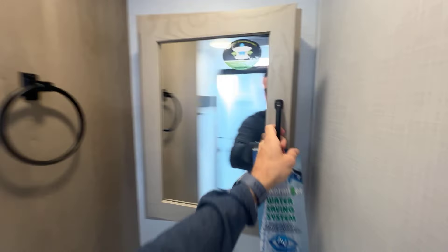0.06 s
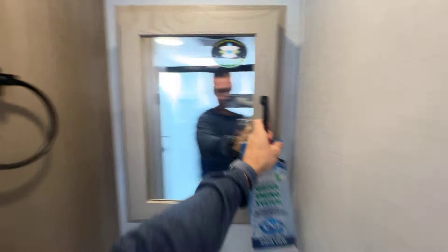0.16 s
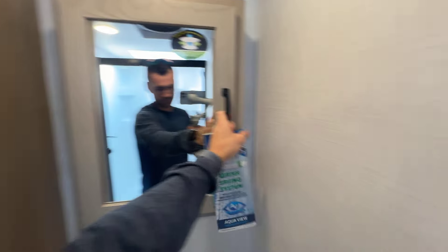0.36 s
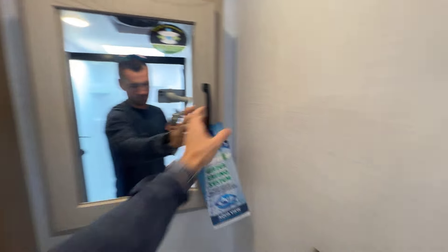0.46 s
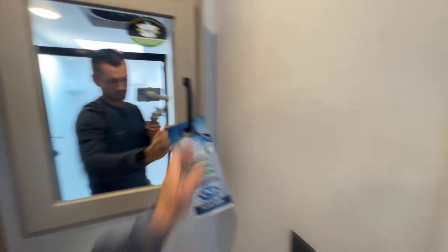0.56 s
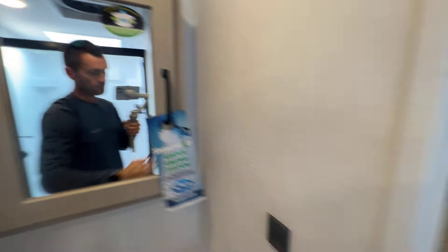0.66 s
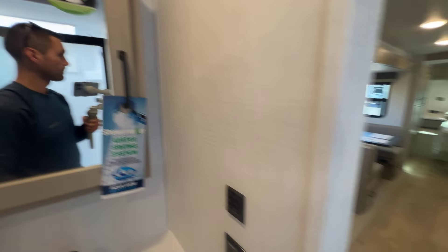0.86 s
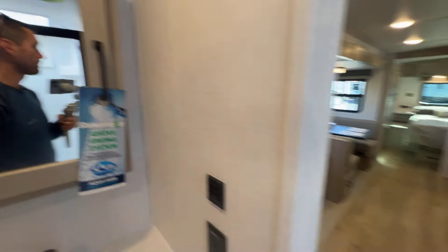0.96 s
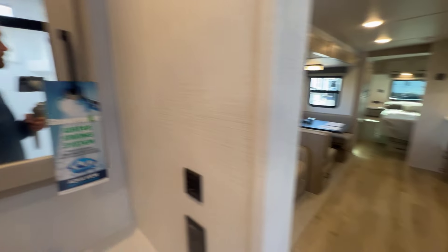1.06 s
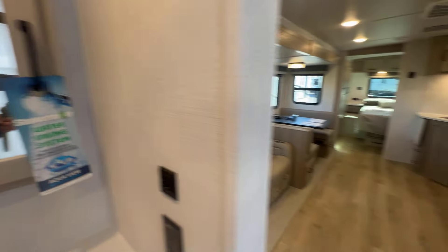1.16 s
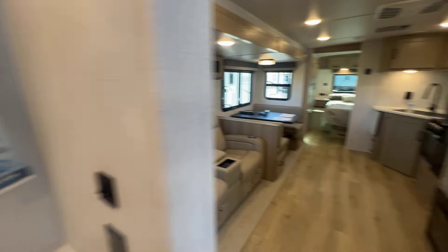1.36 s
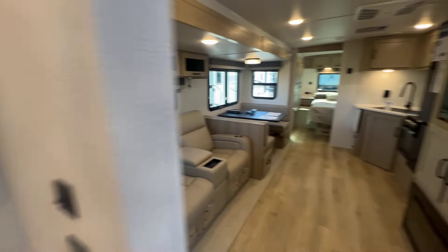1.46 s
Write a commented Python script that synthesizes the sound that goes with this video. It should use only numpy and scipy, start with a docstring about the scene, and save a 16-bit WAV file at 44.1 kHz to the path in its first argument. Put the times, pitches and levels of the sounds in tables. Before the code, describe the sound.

A wooden cabinet door shuts with a sharp knock in a small bathroom.

```python
"""Cabinet door shut in a trailer bathroom.

A mirrored wooden door is pushed shut an arm's length away. The catch snaps in a run of
hard contacts, the panel thumps, the thin walls boom and the small room rings.
A card hanging from the handle swings back, scuffs and taps the door.
Faint rubs, ticks and a footfall follow the knock; a fan murmurs throughout."""
import sys
import numpy as np
from scipy import signal
from scipy.fft import rfft, irfft
from scipy.io import wavfile
from scipy.ndimage import uniform_filter1d

SR = 44100
rng = np.random.default_rng(int(sys.argv[2]) if len(sys.argv) > 2 else 0)


def to_wav(s):
    """Save 16-bit WAV."""
    ch = np.atleast_2d(s).T  # columns
    pcm = np.round(np.clip(ch, -1, 1) * 32767)  # PCM
    wavfile.write(sys.argv[1], SR, pcm.astype(np.int16))


N = 66150

# fan and duct spectrum: freq_hz, gain_db
FAN_SPECTRUM = [(20, -26), (45, 1), (100, -0.5), (180, -12.5), (260, -9.5), (330, -11.5), (420, -1.5),
                (490, -7), (555, -2), (680, -15.5), (850, -22), (1200, -31.5), (1550, -26.5), (1900, -35.5),
                (2450, -33), (3900, -47), (8000, -52.5), (15000, -59.5)]
# drift of the murmur: time_s, gain_db
FAN_DRIFT = [(0, 2), (0.402, -0.5), (0.701, -1), (1.0, .5), (1.13, -2), (1.19, 1), (1.26, -2), (1.4, -2),
             (1.469, -2)]
# wall bumps as the door swings: start_s, level_db
SWING_BUMPS = [(0.02, -24), (0.072, -29.5), (0.161, -32)]
# thin walls and enclosed air: pitch_hz, level_db, t60_s, rise_s
WALL_MODES = [(51, -17.5, 0.98, 0.012), (64.45, -1.5, 0.65, 0.017), (76.05, -8, 0.5, 0.0015)]
# door panel and cabinet: pitch_hz, level_db, t60_s, rise_s
PANEL_MODES = [(95.3, -13, 0.62, .003), (122, -6, 0.15, .002), (142.2, -4.5, .1, 0.0032),
               (147.8, -26, 0.57, .006), (166, -10.5, 0.1575, .001), (187.8, -23.5, 0.47, .002),
               (215.2, -9.5, .28, .012), (231.5, -21.5, 0.53, 0.016), (285.7, -18, .25, 0.0068),
               (361.3, -16.5, .26, 0.004), (457, -29, 0.28, 0.0013), (499.5, -19.5, 0.11, 0.0022),
               (628, -32, 0.089, 0.0022)]
# rubs of hand, sleeve and card: centre_s, level_db, half_width_s
RUB_STROKES = [(0.104, -16.5, 0.023), (0.491, -11, 0.0067), (0.581, -16.5, .006), (1.298, -37, 0.0057),
               (1.425, -30, 0.0017)]
# rub spectrum: freq_hz, gain_db
RUB_SPECTRUM = [(300, 6.5), (1500, -14), (2400, 0.5), (3400, -3), (5000, -16), (9000, -16), (15000, -24)]
# catch hitting frame: start_s, crack_db, ring_db
CATCH_CONTACTS = [(.2113, 0, -9.5), (.2126, 9.5, -9.5), (.2142, 1.5, 0.5), (.2155, 6.5, -11.5),
                  (.2171, -1, 6.5), (.2200, -13.5, -22.5), (.2237, -6, -23)]
# crack spectrum: freq_hz, gain_db
CRACK_SPECTRUM = [(200, -0.5), (600, -8.5), (1050, -2), (1500, -1), (1950, 0), (2400, -0.5), (3300, 2),
                  (4000, -2), (5200, -4), (6000, -4), (7100, -2), (8800, -4.5), (11000, -4.5), (13500, -15),
                  (15500, -9)]
# frame and catch: pitch_hz, level_db, t60_s
FRAME_MODES = [(870, -9.5, .18), (1068, -21.5, 0.094), (1094.5, -16, 0.2), (1401, -14.5, 0.22),
               (1622, -3, 0.17), (2080, -15, .12), (2335, -11.5, 0.22), (2379, 6, 0.041), (2456, -9.5, .07),
               (2976, -8, 0.044), (3223, -12, .09), (3410, -11.5, .1)]
# bathroom reverberation: centre_hz, level_db, t60_s
ROOM_BANDS = [(60, 9.5, .45), (142, 8, .42), (250, 4.5, .3), (390, 12.5, .24), (560, 1.5, .24),
              (750, -5, 0.31), (1000, -5, 0.18), (1455, 1.5, 0.1), (1932, -3, 0.37), (2520, 2, 0.28),
              (2900, -6.5, .32), (3930, -9.5, 0.44), (6783, -5, .4), (9000, -11, .35), (12000, -12.5, .34),
              (15230, -19, .28)]
# dull settling knock: freq_hz, gain_db
REBOUND_SPECTRUM = [(60, -22.5), (200, 0), (370, 3), (520, -14), (1000, -14), (1500, -21.5), (3000, -34),
                    (15000, -62.5)]
# dips and swells of the door's decay: time_s, gain_db
DECAY_SWELL = [(.29, -2), (.38, -3.5), (0.472, 3.5), (.515, 3), (0.562, 2), (.69, 12.5), (.74, 5.5),
               (0.902, 14.5)]
# faint high hiss in the knock's decay: freq_hz, gain_db
TAIL_HISS_SPECTRUM = [(1000, -20), (4000, -2.5), (7000, -1), (12000, -9.5), (15500, -9)]
# ticks of the settling door: start_s, pitch_hz, level_db, t60_s
DOOR_TICKS = [(.483, 3460, -54.5, 0.058), (.582, 1556, -60, .1), (.582, 2160, -57.5, .06),
              (1.299, 2360, -63, 0.056)]
# card edge scuffing the door: start_s, level_db, t60_s
CARD_SCUFFS = [(0.803, 1.004, 0.11), (0.8102, 1, 0.055)]
# scuff spectrum: freq_hz, gain_db
SCUFF_SPECTRUM = [(300, -5), (1500, -31.5), (2000, 11), (2450, 14.5), (3200, 2.5), (5000, 7.5), (8500, 7.5),
                  (12000, 4.5), (15000, 0)]
# card landing on the door: start_s, level_db, t60_s
CARD_TAPS = [(.8300, 9.5, 0.014), (0.84, -0.5, .015), (0.8433, 3, 0.011), (0.855, -4, 0.071)]
# tap spectrum: freq_hz, gain_db
TAP_SPECTRUM = [(300, -16), (800, -1.5), (1300, 1), (1650, -6), (2450, 1.5), (3200, 1.5), (5000, -8.5),
                (8500, -7.5), (11500, -14), (15000, -15)]
# handle resonances: pitch_hz, level_db, t60_s
HANDLE_MODES = [(2456, -56.5, 0.054), (2540, -58, 0.11), (2640, -69, 0.14), (3600, -55, 0.047),
                (4540, -57, 0.04)]
# footfall spectrum: freq_hz, gain_db
STEP_SPECTRUM = [(25, -4), (50, 9.5), (130, -2), (260, -10.5), (450, -1), (800, -25), (3000, -51),
                 (15000, -81)]
# phase of left over right: freq_hz, lead_rad
STEREO_PHASE = [(0, 0), (500, 0), (700, .8), (900, -.4), (1500, -.1), (2700, 0), (3000, .7), (4000, .7),
                (5600, -.2), (7600, -.3), (9500, -2.8), (11000, -4), (13000, -6.1), (14000, -6.3),
                (15600, -8.5)]
# level of left over right: freq_hz, balance_db
STEREO_BALANCE = [(60, 2.2), (300, 2.8), (500, 0), (750, -8.5), (1400, 3), (3000, -1), (15000, -.5)]

SIDE_SIGNS = np.array([[1], [-1]])


def undb(db):
    """Decibels to gain."""
    return 10 ** (np.asarray(db) / 20)


def on_log(hz, points):
    """Interpolate a table over log frequency."""
    freq_hz, values = np.array(points, float).T
    return np.interp(np.log(np.maximum(hz, 1)), np.log(freq_hz), values)


def since(start_s):
    """Seconds since an event, zero before it."""
    return np.maximum(np.arange(N) / SR - start_s, 0)


def fade(t, t60_s):
    """Exponential decay."""
    return np.exp(-np.log(1000) * t / t60_s)


def colour(x, spectrum):
    """Minimum-phase filter that keeps the power of white noise."""
    gain = undb(on_log(np.arange(N + 1) * SR / (2 * N), spectrum))
    cepstrum = irfft(np.log(gain / np.sqrt(np.mean(gain ** 2))))
    cepstrum[1:N] *= 2
    cepstrum[N + 1:] = 0
    return irfft(rfft(x, 2 * N) * np.exp(rfft(cepstrum)))[:N]


def burst(start_s, t60_s):
    """Decaying noise of two surfaces meeting."""
    t = since(start_s)
    return (t > 0) * fade(t, t60_s) * rng.standard_normal(N)


def stroke(centre_s, level_db, half_width_s):
    """Noise under a Gaussian envelope."""
    envelope = np.exp(-((since(0) - centre_s) / half_width_s) ** 2)
    return undb(level_db) * envelope * rng.standard_normal(N)


def ring(start_s, pitch_hz, t60_s):
    """One struck mode."""
    t = since(start_s)
    return np.sin(2 * np.pi * pitch_hz * t) * fade(t, t60_s)


def body(start_s, modes, t60_scale=1, neighbour_sign=1):
    """Heavy modes that build up; neighbour_sign=-1 alternates their polarity."""
    out = 0
    for k, (hz, db, t60_s, rise_s) in enumerate(modes):
        rise = 1 - np.exp(-since(start_s) / rise_s)
        out += neighbour_sign ** k * undb(db) * ring(start_s, hz, t60_s * t60_scale) * rise
    return out


def fan(level_db=-50, side_db=-8.5):
    """Air noise in a few low duct resonances."""
    mid, side = (colour(rng.standard_normal(N), FAN_SPECTRUM) for _ in range(2))
    drift_db = np.interp(since(0), *np.array(FAN_DRIFT).T)
    return undb(level_db + drift_db) * (mid + undb(side_db) * side * SIDE_SIGNS)


def door_swing(t60_scale=0.75, panel_db=-6.5):
    """The moving door nudges the walls and its own panel; the hand damps both."""
    out = 0
    for start_s, db in SWING_BUMPS:
        walls = body(start_s, WALL_MODES, t60_scale, neighbour_sign=-1)
        panel = undb(panel_db) * body(start_s, PANEL_MODES, t60_scale)
        out += undb(db) * (walls + panel)
    return out


def rubs(level_db=-44.5):
    """Dull friction of hand, sleeve and card."""
    return undb(level_db) * colour(sum(stroke(*row) for row in RUB_STROKES), RUB_SPECTRUM)


def catch(crack_db=-15, crack_t60_s=0.022, ring_db=-22.5):
    """Quick hard contacts, each cracking and ringing the frame."""
    cracks = sum(undb(db) * burst(start_s, crack_t60_s) for start_s, db, _ in CATCH_CONTACTS)
    frame = sum(undb(db + mode_db) * ring(start_s, hz, t60_s)
                for start_s, _, db in CATCH_CONTACTS for hz, mode_db, t60_s in FRAME_MODES)
    return undb(crack_db) * colour(cracks, CRACK_SPECTRUM) + undb(ring_db) * frame


def mode_ripple(spread_db=3, width_hz=31.96):
    """Random gain per bin: many faint modes of mirror and handle favour some narrow bands."""
    humps = uniform_filter1d(rng.standard_normal(N // 2 + 1), int(width_hz * N / SR))
    gain = undb(spread_db * humps / humps.std())
    return gain / np.sqrt(np.mean(gain ** 2))


def bathroom(start_s=0.214, level_db=-16, rise_s=0.006, late_cutoff_hz=350):
    """The knock off close walls, as noise: early reflections, short ring, faint tail."""
    t = since(start_s)
    bin_hz = np.arange(N // 2 + 1) * SR / N
    noise = rfft(rng.standard_normal(N)) * mode_ripple()
    log_centres = np.log([row[0] for row in ROOM_BANDS])
    early = undb(1.5) * fade(t, t60_s=0.097)
    late = undb(-29) * fade(t, t60_s=1.25)
    out = 0
    for weights, (centre_hz, db, t60_s) in zip(np.eye(len(ROOM_BANDS)), ROOM_BANDS):
        band = irfft(noise * np.interp(np.log(bin_hz + 1), log_centres, weights), N)
        tail = late / (1 + (late_cutoff_hz / centre_hz) ** 2)
        out += undb(db) * band * (fade(t, t60_s) + early + tail)
    return undb(level_db) * out * (1 - np.exp(-t / rise_s))


def thump(panel_db=2.5, boom_db=0.5, rebound_db=-21.5):
    """The panel lands, sets the walls booming and settles with a dull knock."""
    panel = -undb(panel_db) * body(start_s=0.2213, modes=PANEL_MODES)
    boom = undb(boom_db) * body(start_s=0.2215, modes=WALL_MODES, neighbour_sign=-1)
    rebound = undb(rebound_db) * colour(burst(start_s=0.257, t60_s=0.21), REBOUND_SPECTRUM)
    return panel + boom + rebound


def tail_hiss():
    """Faint high hiss that swells briefly as the knock dies away."""
    return colour(stroke(centre_s=0.434, level_db=-53.5, half_width_s=0.045), TAIL_HISS_SPECTRUM)


def ticks():
    """Tiny pitched ticks of the settling door."""
    return sum(undb(db) * ring(start_s, hz, t60_s) for start_s, hz, db, t60_s in DOOR_TICKS)


def touches(contacts, room_db=-18, room_t60_s=0.37):
    """Light contacts, each lingering in the room."""
    return sum(undb(db) * (burst(start_s, t60_s) + undb(room_db) * burst(start_s, room_t60_s))
               for start_s, db, t60_s in contacts)


def card(contact_db=-45.5):
    """The card scuffs, then taps the door; each touch rings the handle."""
    taps = colour(touches(CARD_TAPS), TAP_SPECTRUM)
    scuffs = colour(touches(CARD_SCUFFS), SCUFF_SPECTRUM)
    handle = sum(undb(db + mode_db) * ring(start_s, hz, t60_s)
                 for start_s, db, _ in CARD_TAPS + CARD_SCUFFS for hz, mode_db, t60_s in HANDLE_MODES)
    return undb(contact_db) * (taps + scuffs) + handle


def footfall():
    """Soft step on the trailer floor."""
    return colour(stroke(centre_s=1.19, level_db=-50.5, half_width_s=0.037), STEP_SPECTRUM)


def stereo(x):
    """Left and right get the sound at a different phase and level per frequency."""
    hz = np.arange(N + 1) * SR / (2 * N)
    lead_rad = np.interp(hz, *np.array(STEREO_PHASE).T)
    left_gain = undb(on_log(hz, STEREO_BALANCE) / 2) * np.exp(0.5j * lead_rad)
    spectrum = rfft(x, 2 * N)
    return np.array([irfft(spectrum * gain)[:N] for gain in (left_gain, 1 / left_gain)])


def scene(room_side_db=-30):
    """Door, card and handling noises over the fan."""
    swell = undb(np.interp(since(0), *np.array(DECAY_SWELL).T))
    door = (catch() + bathroom() + thump()) * swell
    room_side = undb(room_side_db) * bathroom() * swell * SIDE_SIGNS
    mono = door + door_swing() + card() + rubs() + tail_hiss() + footfall() + ticks()
    return stereo(mono) + room_side + fan()


def record(dry, ceiling=0.95, cutoff_hz=16000):
    """Soft peak limit, then low-pass."""
    rounded = dry / (1 + (dry / ceiling) ** 8) ** (1 / 8)
    return signal.sosfilt(signal.ellip(8, 0.2, 70, cutoff_hz, fs=SR, output="sos"), rounded)


dry = scene()
out = record(dry)
to_wav(out)
```